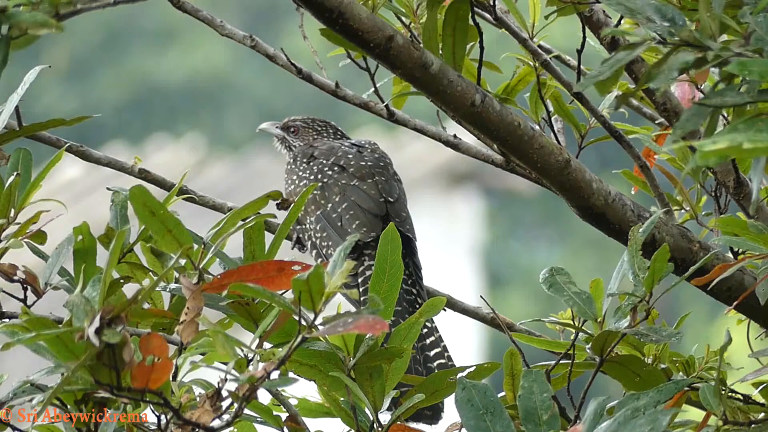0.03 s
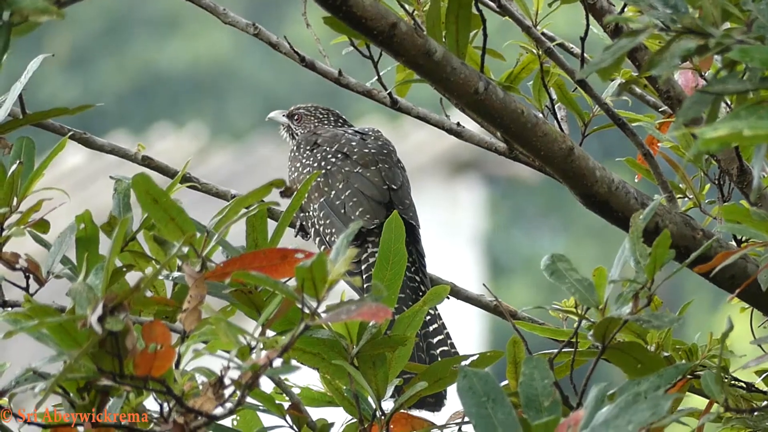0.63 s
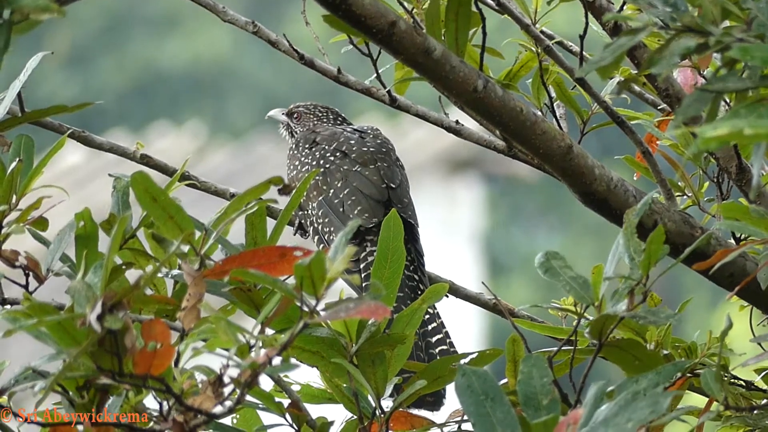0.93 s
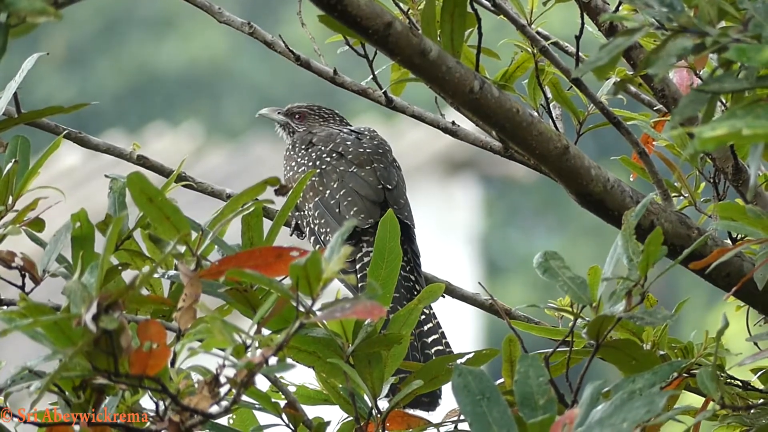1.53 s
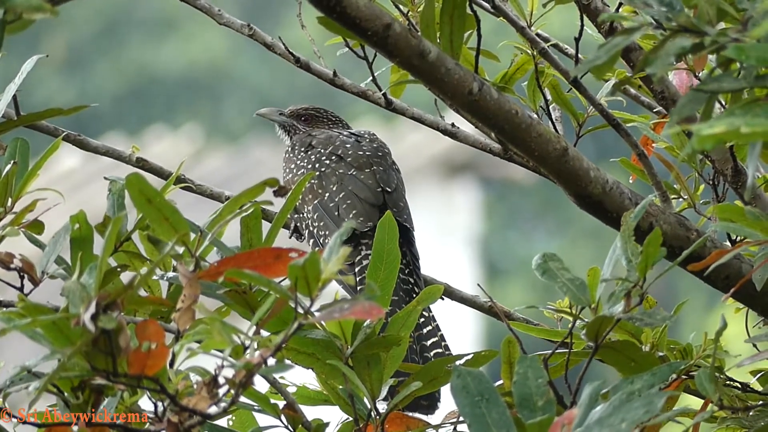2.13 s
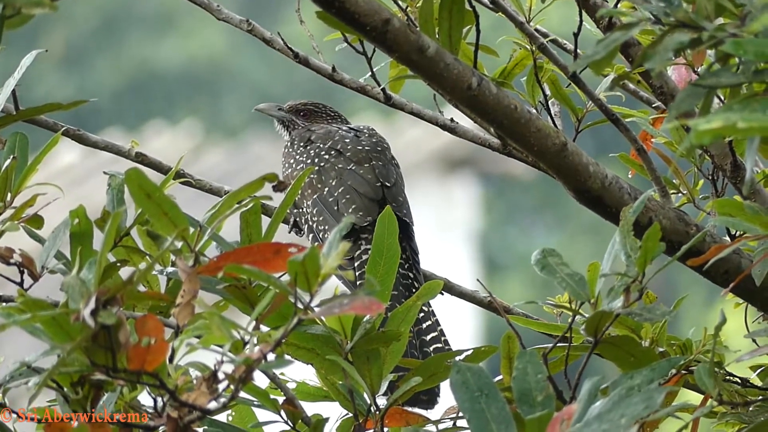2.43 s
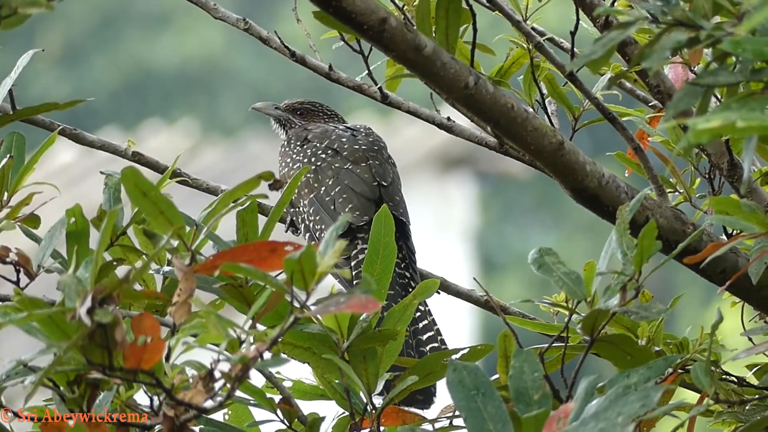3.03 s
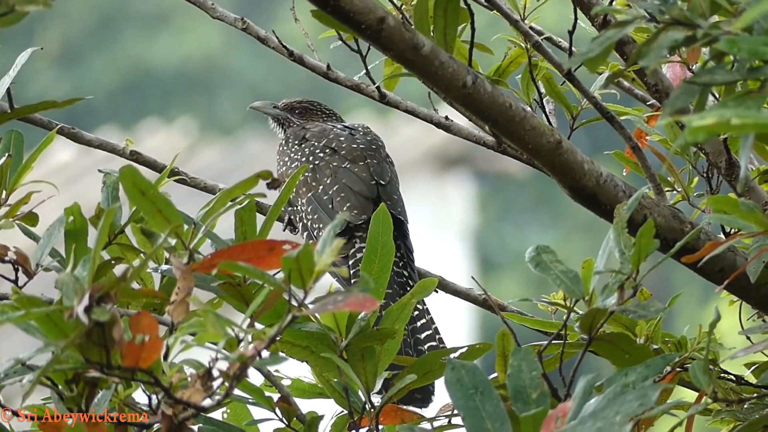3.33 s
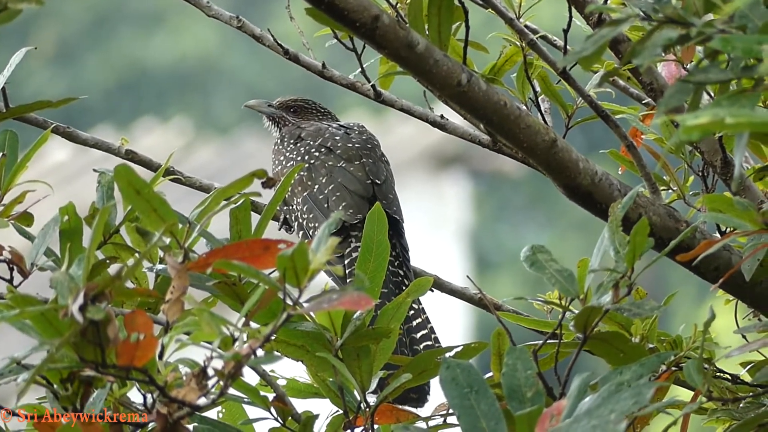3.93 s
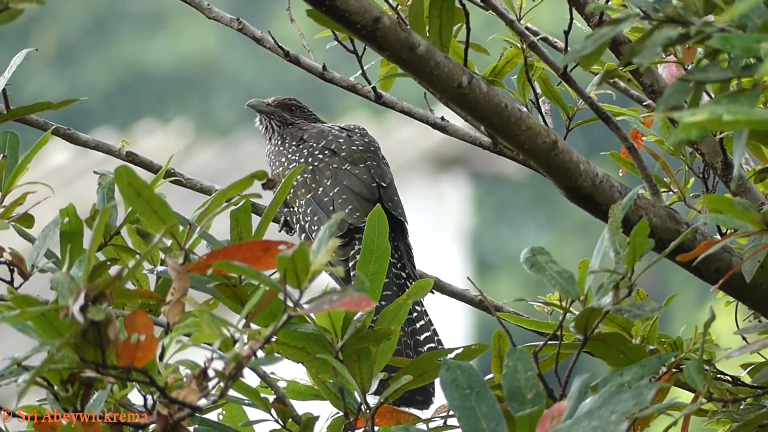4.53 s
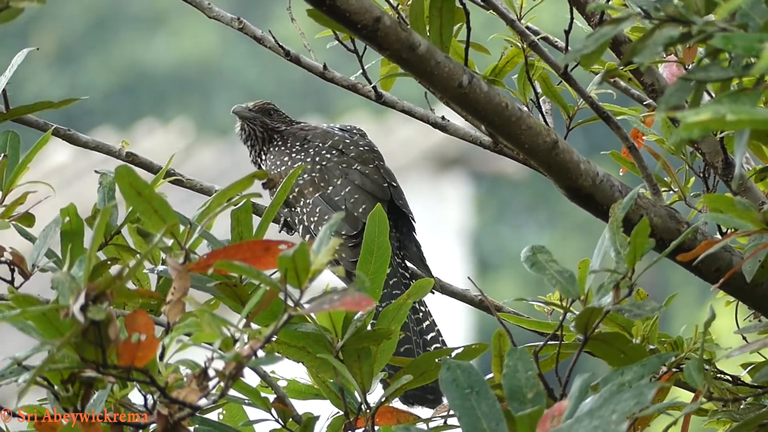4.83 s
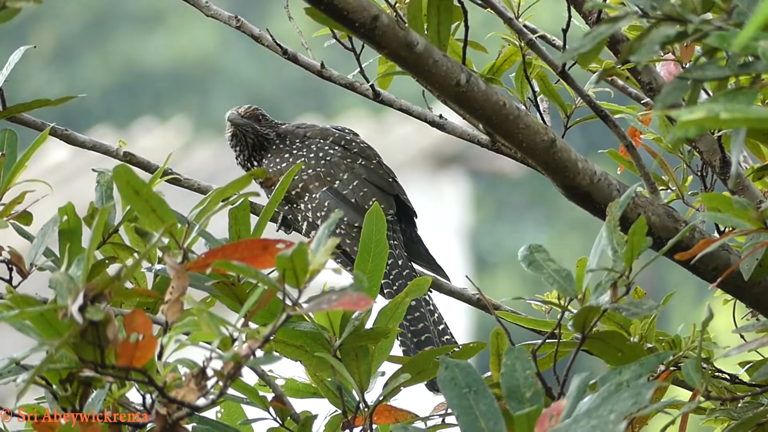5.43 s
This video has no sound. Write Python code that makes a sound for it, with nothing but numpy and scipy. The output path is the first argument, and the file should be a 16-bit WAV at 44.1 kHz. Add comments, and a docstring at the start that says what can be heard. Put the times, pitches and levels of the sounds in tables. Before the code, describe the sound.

Cicadas buzz with a steady, shrill tone in a leafy garden while small birds chirp faintly and distant ones hoot and twitter. A far bird gives a low, rolling trill. About halfway through, a bird close to the microphone calls three loud, quick notes: two rasps that clear into whistles, then a falling whistle. They echo briefly, and the cicadas and faint birds carry on.

```python
"""Cicadas buzz steadily in a leafy garden, their tymbal clicks ringing in abdominal resonances.
Small birds chirp, distant ones hoot and twitter, and a far bird gives a low rolling trill.
Then a bird close by gives three loud notes from the two sides of its syrinx: two rasps that clear
into whistles, then a falling whistle. House walls and foliage throw the notes back, and an
automatic gain control ducks the cicadas under them."""
import sys
import numpy as np
from scipy import signal
from scipy.fft import rfft, irfft, next_fast_len
from scipy.io import wavfile
from scipy.ndimage import uniform_filter1d, map_coordinates

SR = 44100
rng = np.random.default_rng(int(sys.argv[2]) if len(sys.argv) > 2 else 0)


def pcm_store(signal):
    """Save signal as 16-bit PCM."""
    levels = np.round(np.clip(np.atleast_2d(signal), -1, 1) * 32767)
    wavfile.write(sys.argv[1], SR, levels.astype(np.int16).T)


N = 250929
TIME = np.arange(N) / SR


def gain_of(db):
    """Amplitude ratio: a factor of ten for every 20 dB."""
    return 10 ** (np.asarray(db) / 20)


def unit_rms(x):
    """Normalisation to a mean power of 1."""
    return x / np.sqrt(np.mean(abs(x) ** 2) + 1e-20)


def spectrum_at(points, hz):
    """Interpolation of a spectrum on a logarithmic frequency axis."""
    f, value = np.transpose(points)
    return np.interp(np.log(hz + 1), np.log(f + 1), value)


def follow(curve):
    """Linear interpolation of (time, value) points at every sample."""
    return np.interp(TIME, *np.transpose(curve))


def coloured(x, points):
    """Linear filtering: the spectrum is multiplied by a gain curve given in dB."""
    size = next_fast_len(N, True)
    response = gain_of(spectrum_at(points, np.fft.rfftfreq(size, 1 / SR)))
    return irfft(rfft(x, size) * response, size)[..., :N]


def wander(hz):
    """Low-pass noise of rms 1: a random fluctuation with rates up to about hz."""
    return unit_rms(signal.sosfilt(signal.butter(4, hz, fs=SR, output="sos"), rng.standard_normal(N)))


def phasor(hz):
    """A unit oscillation whose phase is the integral of its frequency."""
    return np.exp(2j * np.pi * np.cumsum(hz * np.ones(N)) / SR)


def noise_band(hz, width_hz):
    """Random modulation spreads a tone into a band reaching about width_hz to each side."""
    return phasor(hz) * (wander(width_hz) + 1j * wander(width_hz)) / np.sqrt(2)


def panned(x, db):
    """An interaural level difference places a sound left (+) or right (-)."""
    return x * gain_of([[db / 2], [-db / 2]])


def bumps(times, length):
    """An envelope of smooth, flat-topped swells centred on the times."""
    return sum(np.exp(-((TIME - s) / length * 2) ** 4) for s in times)


def held(start, end, attack_s, release_s):
    """A trapezoidal envelope: 1 from start to end, with linear ramps outside."""
    return np.clip(1 + np.minimum((TIME - start) / attack_s, (end - TIME) / release_s), 0, 1)


def foliage(x, spread=0.17, sway_s=0.00016, echoes_per_s=3000):
    """Multiple scattering by leaves and trunks leaves a tail; stirring leaves Doppler-blur its pitch."""
    # decay among the trees: (frequency [Hz], reverberation time [s])
    decay_times = [(500, 0.75), (2200, 1.27), (3500, 1.28), (8000, 0.41)]
    taps = rng.standard_normal((2, SR)) * (rng.random((2, SR)) < echoes_per_s / SR)
    hz, t, spectra = signal.stft(taps, SR, nperseg=256)
    decay = gain_of(-60 * t / spectrum_at(decay_times, hz)[:, None])
    build_up = 1 - np.exp(-t / 0.0038)
    mid, side = signal.istft(spectra * decay * build_up, SR, nperseg=256)[1]
    tail = np.array([mid + spread * side, mid - spread * side]) / np.linalg.norm(mid)
    swayed = (TIME + sway_s * wander(40)) * SR
    return np.array([map_coordinates(signal.fftconvolve(x, ear)[:N], [swayed], order=3) for ear in tail])


def outdoors():
    """Ambient noise: a distant wash and a thin hiss, largely coherent between the ears, and a drone."""
    # likeness of the two ears: (frequency [Hz], correlation [0-1])
    coherence = [(25, .35), (60, 0.72), (130, 0.91), (290, 0.81), (640, 0.9), (1410, 0.92), (3100, 0.84),
                 (6820, 0.596), (15000, 0.66)]
    # spectra of the wash and the hiss: (frequency [Hz], relative level [dB])
    wash_spectrum = [(18, -67.5), (30, -33), (60, -25.5), (140, -8.5), (210, -18), (256, -14), (312, -20),
                     (344, -14), (462, -2.5), (590, -11.5), (673, -11), (805, -3), (1140, -4),
                     (1360, -10.5), (1500, -29), (1950, -28), (3300, -120)]
    hiss_spectrum = [(200, -44), (1100, -22.5), (1500, 1), (2100, 2.5), (3000, 2.5), (4300, -0.5),
                     (5200, -2.5), (6000, 3), (8000, -2), (12500, 4), (14500, -1.5), (15500, -4)]
    # slow course of the wash: (time [s], level [dB])
    wash_levels = [(.4, -53.5), (1.5, -53.5), (2.5, -55), (3.2, -50.5), (4.2, -55), (4.7, -56),
                   (5.69, -55.5)]
    left, independent = rng.standard_normal((2, N))
    alike = spectrum_at(coherence, np.fft.rfftfreq(N, 1 / SR))
    right = irfft(alike * rfft(left) + np.sqrt(1 - alike ** 2) * rfft(independent), N)
    pair = np.array([left, right])
    swell_db = .7 * wander(6)
    wash = gain_of(follow(wash_levels) + swell_db) * unit_rms(coloured(pair, wash_spectrum))
    hiss = gain_of(-57 + swell_db) * unit_rms(coloured(pair, hiss_spectrum))
    drone = gain_of(-63.5) * noise_band(468, 22).real
    return wash + drone + hiss


def thud():
    """A brief swell of low narrow-band noise is heard as a soft, distant thud."""
    return gain_of(-54) * bumps([5.28], length=0.054) * noise_band(393, 107).real


def laugh(peak_s, hz, db, fade_db_per_s, swell_db_per_s=19, sink_hz_per_s=1050):
    """Random amplitude modulation makes a blurred call throb; it swells, then sinks as it fades."""
    before, after = np.maximum(peak_s - TIME, 0), np.maximum(TIME - peak_s, 0)
    tone = noise_band(hz - sink_hz_per_s * np.minimum(after, 1), 500).real
    throb_db = 2.5 * wander(14)
    return gain_of(db - swell_db_per_s * before - fade_db_per_s * after + throb_db) * tone


def far_birds(arch=.05):
    """Spectral broadening: hoots, arched twitters and laughing calls arrive smeared by the trees."""
    # very distant hoots: (start [s], level [dB])
    hoot_calls = [(0.356, -43.5), (.80, -48.5), (1.18, -51), (1.40, -45.5), (2.85, -45), (4.128, -40),
                  (5.049, -49), (5.589, -47.5)]
    # twitters: (centre [s], length [s], top pitch [Hz], level [dB])
    twitter_calls = [(0.878, 0.059, 2630, -50), (1.028, 0.061, 2647, -51.5), (1.282, 0.062, 2470, -51),
                     (3.786, 0.074, 2810, -50.5), (3.96, .07, 2586, -50.5), (4.741, .04, 3535, -55),
                     (5.142, 0.044, 3470, -54), (5.259, .051, 3445, -47.5), (5.352, 0.043, 3380, -52.5),
                     (5.553, 0.04, 3650, -57), (5.653, 0.045, 3610, -38.5)]
    # laughing calls: (peak time [s], pitch [Hz], level [dB], fade [dB/s])
    laugh_calls = [(0.369, 4090, -47, 41), (1.78, 3913, -52, 11)]
    swell = twitters = 0
    for start, db in hoot_calls:
        rise = np.maximum(TIME - start, 0) / 0.047
        swell += gain_of(db) * rise * np.exp(1 - rise)
    hoots = swell * (noise_band(1150, 45.5) + gain_of(-11.5) * noise_band(2120, 220)).real
    blur = .6 + .8 * noise_band(0, 110)
    for centre, length, hz, db in twitter_calls:
        bend = 1 - arch * np.minimum((2 * (TIME - centre) / length) ** 2, 2)
        twitters += gain_of(db) * bumps([centre], length) * (blur * phasor(hz * bend)).real
    return hoots + twitters + gain_of(-7.5) * foliage(twitters) + sum(laugh(*row) for row in laugh_calls)


def tymbal(clicks_hz, blur, drift, sweep_hz_per_s=800000):
    """Each buckling of the tymbal is a down-swept click; leaf scatter adds different noise at each ear."""
    cycles = np.floor(np.cumsum(clicks_hz * (1 + drift * wander(1.929))) / SR)
    clicks = np.diff(cycles, prepend=0) * np.sign(rng.standard_normal(N))
    hz = np.fft.rfftfreq(N, 1 / SR)
    swept = irfft(rfft(clicks) * np.exp(1j * np.pi * hz ** 2 / sweep_hz_per_s), N)
    return unit_rms(swept) + blur * rng.standard_normal((2, N))


def shrill_cicadas():
    """Abdominal resonance near 10 kHz filters three click trains into a steady, shrill buzz."""
    # the insects: (click rate [Hz], relative level [dB], left over right [dB])
    insects = [(159.8, 0, 3.0), (146, -4, 1.2), (141, -5, 1.2)]
    # response of the abdomen: (frequency [Hz], relative gain [dB])
    resonance = [(4760, -53), (8100, -33), (8950, -13), (9550, -9.5), (9890, -5.5), (10100, 4.5),
                 (10500, -3), (10700, -15), (10900, -15.5), (11500, -27), (11900, -47.5), (15500, -53),
                 (22000, -120)]
    clicks = sum(gain_of(db) * panned(tymbal(hz, blur=.78, drift=.005), pan) for hz, db, pan in insects)
    return gain_of(-36.5 + 0.45 * wander(6.3)) * unit_rms(coloured(clicks, resonance))


def low_cicadas(first_burst_s=1.69, burst_every_s=.496, growth_db_per_s=0.82, width=.42):
    """Abdominal resonance near 7 kHz: two cicadas buzz, and a third adds fast bursts that grow."""
    # response of the abdomen: (frequency [Hz], relative gain [dB])
    resonance = [(4500, -60), (6000, -58.5), (6450, -13.5), (6800, -5), (7100, 7.5), (7300, -3.5),
                 (7550, -10.5), (8000, -56), (9000, -60.5)]
    burst = np.clip(bumps(np.arange(first_burst_s, N / SR, burst_every_s), .17), 0, 1)
    level_db = -46 + burst * (1.5 + growth_db_per_s * (TIME - first_burst_s))
    slow = tymbal(80, blur=.85, drift=.025) + .6 * tymbal(85, blur=.6, drift=.07)
    clicks = (1 - .6 * burst) * slow + 1.5 * burst * tymbal(218, blur=.6, drift=.012)
    mid = clicks.mean(0)
    narrowed = mid + width * (clicks - mid)
    return gain_of(level_db) * panned(unit_rms(coloured(narrowed, resonance)), db=0.3)


def far_cicada(first_s=0.548, every_s=.765):
    """Periodic modulation of a noise band gives a far cicada's evenly spaced lower notes."""
    return gain_of(-55) * bumps(np.arange(first_s, N / SR, every_s), 0.17) * noise_band(6040, 300).real


def small_birds(chip_s=0.026, chip_from_hz=3330, chip_to_hz=4960, ease=0.555):
    """Frequency sweeps: thin, fluttering whistles glide up or down and ease into their last pitch."""
    # one bird's rising chips: (start [s], level [dB])
    chips = [(.820, -45), (2.603, -54), (3.219, -43), (3.534, -46.5), (3.801, -49)]
    # another's falling slurs: (start [s], length [s], first pitch [Hz], last pitch [Hz], level [dB])
    slurs = [(0.516, 0.085, 4920, 3740, -42), (1.291, .145, 4470, 3854, -50),
             (4.783, .041, 4650, 4280, -60)]
    calls = slurs + [(start, chip_s, chip_from_hz, chip_to_hz, db) for start, db in chips]
    out = np.zeros(N)
    for start, length, from_hz, to_hz, db in calls:
        at = np.flatnonzero((TIME >= start) & (TIME < start + length))
        part = np.linspace(0, 1, len(at))
        hz = from_hz + (to_hz - from_hz) * part * (1 + ease * (1 - part))
        envelope = gain_of(db) * signal.windows.tukey(len(at), .6)
        out[at] += envelope * np.sin(2 * np.pi * np.cumsum(hz) / SR)
    return out * (1 + 0.39 * wander(140))


def trill(start, length, top_hz, db, accent_db, clear_s, low_hz=736.6, roll_hz=37, sag=0.13):
    """Amplitude and frequency modulation chop a low hoot into uneven pulses that arch and slide down."""
    age = np.clip(TIME - start, 0, length)
    remaining, part = length - age, age / length
    lift = (1 - np.exp(-age / .019)) * (1 - np.exp(-remaining / .028))  # pitch leaps up, drops back
    hz = low_hz + lift * (top_hz * (1 - sag * part ** 2) - low_hz)
    db = db + accent_db * np.exp(-(age / 0.059) ** 2) - 6.5 * (1 - part)  # an accent, then a swell
    edges = np.minimum(np.minimum(age, remaining) / .022, 1)
    depth = 0.96 * np.minimum(np.minimum(age / 0.05, remaining / clear_s), 1) ** 2
    roll = phasor(roll_hz * (1 + .1 * wander(20)))
    gate = 1 - depth * (.5 - .5 * np.tanh(2.5 * (roll.real + .25)))
    bend = 0.033 * (roll.real - .6) - 0.023 * roll.imag + .009 * wander(45)  # arch, slide, jitter
    return np.sqrt(2) * gain_of(db) * edges * gate * phasor(hz * (1 + depth * bend)).real


def trilling_bird():
    """A far bird's phrase of four pulse-modulated hoots."""
    # (start [s], length [s], top pitch [Hz], level [dB], opening accent [dB], fade of the roll [s])
    phrase = [(1.688, 0.0605, 993, -41.5, 7.5, 0.029), (2.217, 0.16, 914, -40, 8, .002),
              (2.365, .565, 916.5, -36.5, 1, .002), (3.228, 0.6, 941, -41, 16, .095)]
    return sum(trill(*row) for row in phrase)


def smear(start=2.985, end=3.125):
    """A soft noise band with a falling centre frequency, between the near bird's first two notes."""
    hz = np.interp(TIME, [start, end], [2150, 1680])
    return gain_of(-40) * held(start, end, 0.011, .02) * noise_band(hz, 390).real


def ticks(decay_s=0.00091):
    """Exponentially damped puffs of noise are heard as dull ticks during the falling whistle."""
    # (time [s], level before filtering [dB])
    puffs = [(3.306, -28), (3.319, -42), (3.36, -19)]
    envelope = sum(gain_of(db) * (TIME >= s) * np.exp(-np.maximum(TIME - s, 0) / decay_s)
                   for s, db in puffs)
    dulling = [(300, -8.5), (1200, 3.5), (6000, -12), (12000, -20)]  # (frequency [Hz], gain [dB])
    return coloured(envelope * rng.standard_normal(N), dulling)


def syrinx(hz, level, rasp, jitter=0.002):
    """Chaotic vibration turns one side's whistle to a rasp; gives the tone and its chaotic amplitude."""
    hz = hz * (1 + jitter * wander(250))
    chaos = noise_band(hz, 430)
    return level * (np.sqrt(1 - rasp ** 2) * phasor(hz) + rasp * chaos), level * rasp


def rasp_burst(start, length, hz, db, rasp, attack_s=0.006, release_s=.005):
    """A short chaotic vibration of the syrinx that grows and dies exponentially."""
    edges = np.exp(np.clip(np.minimum((TIME - start) / attack_s, (start + length - TIME) / release_s),
                           -20, 0))
    return syrinx(hz, gain_of(db) * edges, rasp)


def whistle(note, glide, soft_db=-23.5, soft_rasp=0.28, pushed_rasp=.04):
    """A push makes a soft, hoarse glide loud and nearly periodic, so that it sounds clear."""
    start, end, db, fade_db_per_s = note
    push = held(start, end, attack_s=0.0061, release_s=0.012)
    fade_db = fade_db_per_s * push * np.maximum(TIME - start, 0)
    catch_db = -11 * bumps([3.341], length=0.0144)  # the falling whistle catches briefly
    edges = np.clip(np.minimum(TIME - glide[0][0], glide[-1][0] - TIME) / .003, 0, 1)
    level = gain_of(db + soft_db * (1 - push) - fade_db + catch_db) * edges
    return syrinx(follow(glide), level, soft_rasp + (pushed_rasp - soft_rasp) * push)


def near_bird(coupling=0.32, fizz_db=-20, bright_db=12.5, bright_fade_s=0.13):
    """The two sides of the syrinx beat; nonlinear coupling adds sidebands, and rasps add fizz."""
    # pushes of each side: (start [s], end [s], level [dB], fade [dB/s])
    first_notes = [(2.924, 2.939, -10.5, 130), (3.101, 3.166, -7, 85), (3.32, 3.394, -8, 69)]
    second_notes = [(2.933, 2.951, -11, 180), (3.128, 3.197, -15.5, 18)]
    # glides of each side, one curve a note: (time [s], pitch [Hz])
    first_glides = [
        [(2.907, 2007), (2.925, 2571), (2.942, 2603), (2.975, 2563)],
        [(3.08, 3280), (3.098, 3385), (3.135, 3417), (3.195, 3303), (3.23, 3320)],
        [(3.306, 3056), (3.323, 3123), (3.345, 2880), (3.405, 2435), (3.45, 1810), (3.474, 1776)],
    ]
    second_glides = [
        [(2.922, 2644), (2.952, 2880), (3.012, 2937)],
        [(3.112, 3266), (3.165, 3201), (3.194, 3246), (3.208, 3130)],
    ]
    # rasps opening the first two notes: (start [s], length [s], pitch [Hz], level [dB], rasp [0-1])
    rasps = [(2.858, 0.0057, 3110, -23, 0.47), (2.874, 0.019, 3240, -23, 1),
             (2.902, 0.0038, 3515, -23.5, 0.5), (3.06, .009, 3850, -18, 1), (3.076, 0.012, 3265, -19, 0.6)]
    # filter on the harmonics: (frequency [Hz], gain [dB])
    overtone_filter = [(4500, -67), (5700, -45), (6200, -55), (7000, -49), (8200, -63.5), (11000, -47.5),
                       (13300, -43.5), (15500, -49)]
    # hissing edge of the rasps: (frequency [Hz], relative level [dB])
    fizz_spectrum = [(1000, -26), (1500, -2.5), (2500, -21), (4000, -2.5), (5500, -6), (8000, -24),
                     (11000, -19.5), (13000, -12.5), (15500, -33)]
    parts = list(map(whistle, first_notes, first_glides)) + [rasp_burst(*row) for row in rasps]
    first, strain = map(sum, zip(*parts))
    second = sum(tone for tone, _ in map(whistle, second_notes, second_glides))
    sidebands = first ** 2 * second.conj() + second ** 2 * first.conj()  # at 2 f1 - f2 and 2 f2 - f1
    tone = first + second + coupling * sidebands / (abs(first) ** 2 + abs(second) ** 2 + 1e-12)
    phase = np.angle(tone)
    harmonics = sum((np.exp(1j * k * phase) * (.5 + .85 * noise_band(0, 380))).real for k in range(2, 6))
    start, end = first_notes[0][:2]  # the call opens with stronger overtones
    opening = held(start, N / SR, .015, .015) * np.exp(-np.maximum(TIME - end, 0) / bright_fade_s)
    overtones = coloured(abs(tone) * harmonics * gain_of(bright_db * opening), overtone_filter)
    fizz = gain_of(fizz_db) * strain * unit_rms(coloured(rng.standard_normal(N), fizz_spectrum))
    return np.sqrt(2) * (tone.real + overtones) + fizz


def with_reflections(voice):
    """Specular reflection from house walls gives echoes; leaves scatter the low notes back best."""
    # wall echoes: (delay [s], gain [dB])
    walls = [(.034, -20), (.06, -28.5), (.125, -30)]
    # scattering by the leaves: (frequency [Hz], gain [dB])
    scatter = [(1400, -6), (1900, -19), (2300, -5.5), (2700, -35.5), (3300, -32.5), (4500, -28.5),
               (9000, -47.5)]
    echoes = sum(gain_of(db) * np.interp(TIME - delay, TIME, voice) for delay, db in walls)
    return voice + echoes + foliage(coloured(voice, scatter))


def scene():
    """Superposition of the birds, their reflections, the cicadas and the open air."""
    trills, chirps, bump = trilling_bird(), small_birds(), thud()
    near = with_reflections(near_bird()) + ticks() + smear()
    scattered = gain_of(-16.5) * foliage(trills) + gain_of(-4.5) * foliage(chirps)
    other_birds = trills + chirps + scattered + far_birds()
    cicadas = shrill_cicadas() + low_cicadas() + far_cicada()
    return outdoors() + bump + cicadas + other_birds + near


def record(dry, threshold_db=-25, slope=0.38, recovery_db_per_s=16, silent_s=.372, cutoff_hz=15600):
    """Gain control compresses the loud notes; the sound opens after a silence and is band-limited."""
    power_db = 10 * np.log10(abs(uniform_filter1d((dry ** 2).mean(0), size=300)) + 1e-12)
    wanted_db = slope * np.maximum(power_db - threshold_db, 0)
    recovery_db = TIME * recovery_db_per_s
    duck_db = np.maximum.accumulate(wanted_db + recovery_db) - recovery_db  # fast attack, slow release
    fade_in = np.clip((TIME - silent_s) / 0.0017, 0, 1)
    out = dry / gain_of(uniform_filter1d(duck_db, size=150)) * fade_in
    low_pass = signal.firwin(511, cutoff_hz, window=("kaiser", 9), fs=SR)
    return signal.oaconvolve(out, low_pass[None], "same")


dry = scene()
out = record(dry)
pcm_store(out)
```